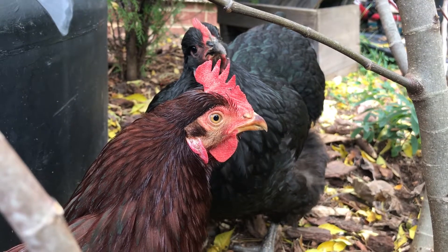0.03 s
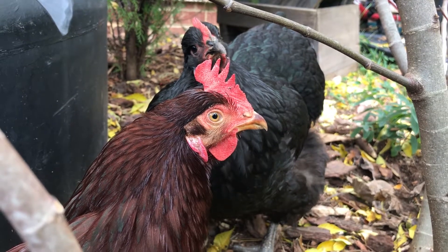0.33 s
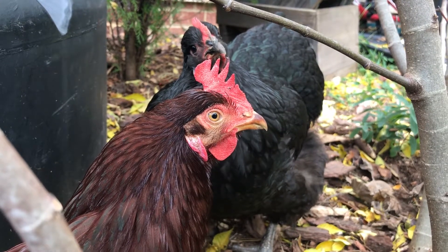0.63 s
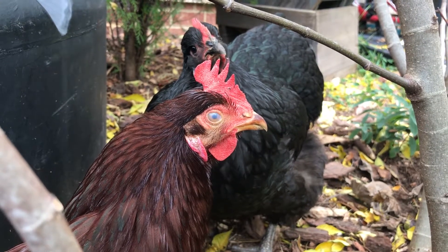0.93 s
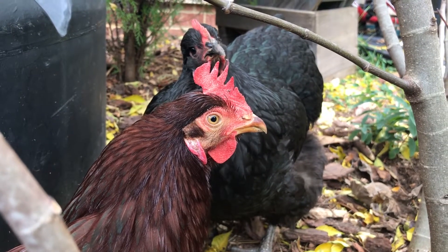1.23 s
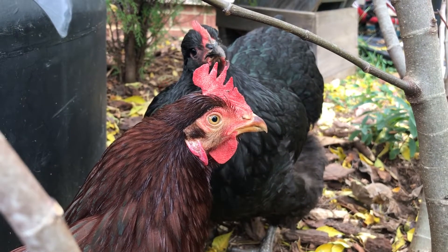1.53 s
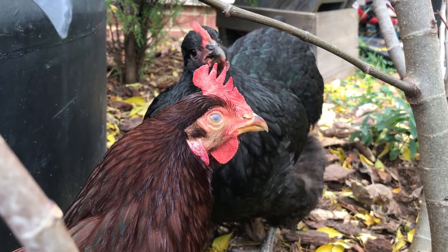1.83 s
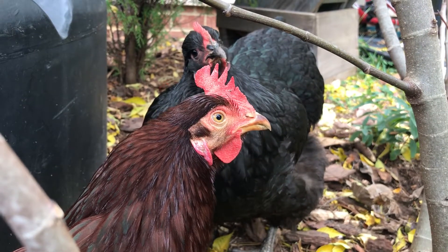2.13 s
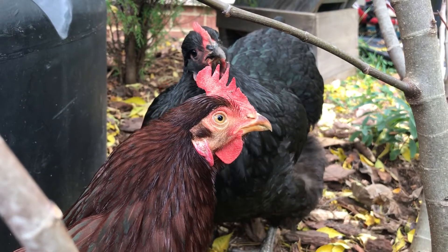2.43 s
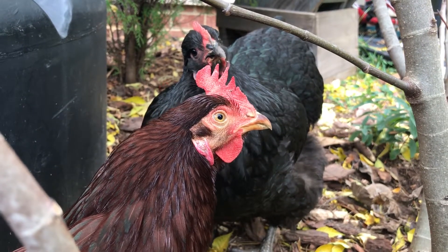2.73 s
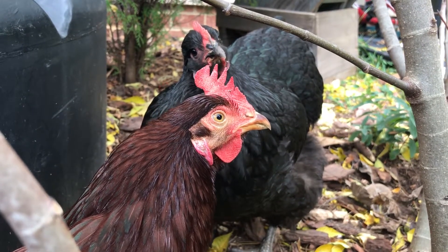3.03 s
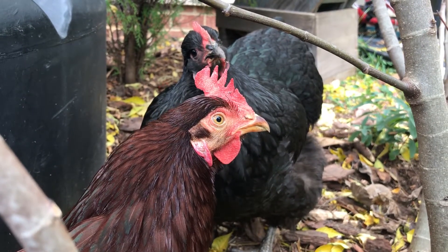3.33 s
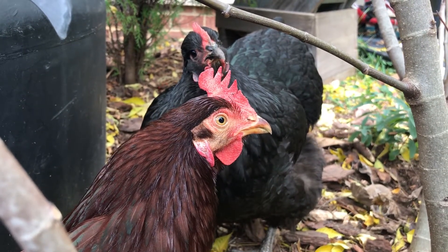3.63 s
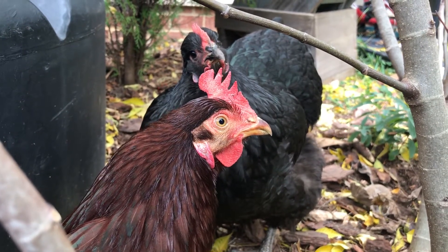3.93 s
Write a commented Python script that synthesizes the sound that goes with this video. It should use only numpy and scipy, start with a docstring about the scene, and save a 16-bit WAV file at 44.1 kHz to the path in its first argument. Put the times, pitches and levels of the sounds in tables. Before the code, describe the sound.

A hen purrs close by from the start until about 3.5 seconds, a rapid run of tiny chirps wavering in pitch. From about 1.3 to 3.1 seconds, louder, higher pips trill over it, probably a second hen, with a low burble between them. A faint outdoor rumble lies underneath, with a barely audible distant bird early on. A soft shuffle swells just before 4 seconds.

```python
"""Two hens resting in fallen leaves.

Close up, one hen purrs throughout: about 37 tiny gliding chirps a second, shaped by her throat.
Midway, louder, higher pips, probably the second hen's, trill over it with a low burble between them.
Behind: a thin far bird, low outdoor rumble, a soft shuffle at the end, faint ticks of the electronics."""
import sys
import numpy as np
from scipy import signal
from scipy.fft import rfft, irfft, next_fast_len
from scipy.io import wavfile
from scipy.ndimage import map_coordinates

SR = 44100
rng = np.random.default_rng(int(sys.argv[2]) if len(sys.argv) > 2 else 0)


def bounce(signal):
    """Save signal as a 16-bit WAV file at the path given by the first command-line argument."""
    frames = np.transpose(np.atleast_2d(signal))
    limited = np.clip(frames, -1, 1)
    pcm = np.round(limited * 32767).astype(np.int16)
    wavfile.write(sys.argv[1], SR, pcm)


N = 176400
T = np.arange(N) / SR

# Purr pace. Each row: time in seconds, chirps so far.
PURR_COUNT = [(.009, 0), (.535, 20), (.877, 33), (1.227, 46), (1.657, 62), (1.776, 66), (2.239, 83),
              (2.655, 98), (3.103, 114), (3.193, 117), (3.504, 128)]
# Purr pitch. Each row: time in seconds, pitch in Hz.
PURR_PITCH_HZ = [(.01, 721), (.115, 888), (.2, 745), (.43, 646), (.51, 732), (.66, 819), (.8, 828),
                 (.825, 720), (.877, 886), (1.04, 631), (1.11, 760), (1.24, 621), (1.44, 591), (1.52, 695),
                 (1.69, 592), (1.86, 654), (2.0, 581), (2.16, 734.5), (2.25, 609.5), (2.36, 709),
                 (2.48, 581), (2.55, 682), (2.66, 573), (2.82, 631), (2.88, 559), (3.02, 757), (3.05, 544),
                 (3.16, 564), (3.221, 807), (3.278, 545), (3.306, 530), (3.335, 789), (3.445, 728),
                 (3.476, 512.5)]
# Purr unrest. Each row: time in seconds, chirp-to-chirp pitch scatter as a fraction.
PURR_JITTER = [(1.2, .035), (1.4, .075), (3, .075), (3.1, .02)]
# Purr effort. Each row: time in seconds, level in dB.
PURR_EFFORT_DB = [(.01, -41.5), (.42, -39), (.95, -39), (1.3, -39), (2.7, -40.5), (3.163, -43),
                  (3.278, -38.5), (3.36, -42.5), (3.48, -38.5)]
# Purr chirps turn from sharp to arched. Each row: time in seconds, arch from 0 to 1, length in seconds.
PURR_SHAPE = [(1.104, 0.19, .019), (1.505, 1, 0.027), (2.913, 1, .02), (3.21, 1, 0.017)]
# The two chirp shapes. Each row: fraction of the length, pitch ratio, level in dB.
SHARP_CHIRP = [(0, 1.0, -22), (.06, 1.04, 1), (.14, 1.08, 5), (.42, .98, -1), (.66, 1.01, -1.5),
               (.88, .82, -8), (1, .68, -22)]
ARCHED_CHIRP = [(0, 0.74, -19.5), (.07, 0.917, -0.5), (.36, 1.156, 1), (.72, .9, -.5), (1, 0.69, -14)]
# Voice source. Each entry: harmonic level in dB, fundamental first.
HARMONICS_DB = [0.5, -12, -24.5, -32.5, -36.5]
# Throat resonances. Each row: frequency in Hz, gain in dB.
THROAT_DB = [(250, -24), (480, -1.5), (700, -0.5), (900, -0.5), (1080, 9), (1280, -1), (1520, -0.5),
             (1800, -5), (2100, -10), (2600, -19.5), (3000, -11.5), (3700, -2.5), (4400, -19)]
# Pips of the trill. Each row: centre in seconds, level in dB.
PIP_NOTES = [(.1198, -28), (1.266, -28), (1.3198, -29), (1.4545, -31.5), (1.4798, -28), (1.5588, -30),
             (1.6391, -29), (1.6664, -31), (1.7189, -26.5), (1.7777, -30.5), (1.7984, -26), (1.8266, -29.5),
             (1.9346, -32), (1.9594, -25), (1.9923, -37), (2.0172, -30), (2.0434, -28.5), (2.0962, -29),
             (2.1235, -26), (2.174, -27.5), (2.2024, -30), (2.23, -25.5), (2.261, -35), (2.287, -28),
             (2.3409, -32), (2.3659, -26), (2.394, -29), (2.421, -26.5), (2.5047, -32), (2.5346, -30),
             (2.5591, -33), (2.5868, -25), (2.6133, -35), (2.6403, -25), (2.6701, -28.5), (2.7524, -34.5),
             (2.7794, -34.5), (2.8057, -33), (2.8318, -29), (2.8581, -28.5), (2.8849, -25.5),
             (2.9155, -30.5), (2.9418, -35), (3.0799, -34), (3.1327, -28.5)]
# Late pips are higher and fall faster.
# Each row: time in seconds, pitch of a loud pip in Hz, fall per half length as a fraction.
PIP_GLIDE = [(1.3, 942.3, 0.0055), (2.4, 963.3, .015), (2.62, 977, 0.0576), (3.13, 996, 0.079)]
# Pip partials, the odd halves from period doubling. Each row: multiple of the pitch, level in dB.
PIP_PARTIALS_DB = [(.5, -23.5), (1, 0.5), (1.5, -24.5), (2, -22.5), (2.5, -39), (3, -42), (4, -41),
                   (5, -52)]
# Burble contour. Each row: time in seconds, level in dB, pitch in Hz.
BURBLE_CONTOUR = [(1.1, -48, 450), (1.25, -37.5, 409), (1.7, -48, 438), (3.06, -43.5, 521.6)]
# Far bird. Each row: start in seconds, length in seconds, pitch in Hz, level in dB, waver in Hz.
BIRD_WHISTLES = [(-.1, 0.45, 7670, -78.5, 100), (1.031, 0.16, 8000, -84, 16)]
# Shuffle swell. Each row: time in seconds, level in dB.
SHUFFLE_LEVEL_DB = [(3.8, -79), (3.92, -66), (4, -50.5)]
# Noise spectra. Each row: frequency in Hz, relative level in dB.
RASP_SPECTRUM = [(220, -33), (430, 8), (950, 8), (1350, -5), (2400, -37.5), (3200, -23), (3650, -15.5),
                 (4300, -59), (12000, -55.5)]
RUMBLE_SPECTRUM = [(24, -31), (38, -5), (60, 1.5), (90, 0.5), (155, -8.5), (220, -19.5), (600, -52.5)]
AIR_SPECTRUM = [(300, -4.5), (670, -10.5), (1100, -9.5), (2500, -23), (4450, -28), (9500, -33.5),
                (10500, -38.5), (13000, -26), (15800, -32)]
SHUFFLE_SPECTRUM = [(100, -10.5), (400, 8), (1000, 4), (1500, -20), (9000, -37)]
TICK_SPECTRUM = [(4000, -16.5), (13000, 1.5)]


def purr(scatter_db=.7):
    """One hen's unbroken run of chirps, no two alike."""
    out = np.zeros(N)
    times_s, counts = np.transpose(PURR_COUNT)
    for start_s in np.interp(np.arange(counts[-1] + 1), counts, times_s):
        pitch_hz, = curves(PURR_PITCH_HZ, start_s)
        effort_db, = curves(PURR_EFFORT_DB, start_s)
        jitter, = curves(PURR_JITTER, start_s)
        arch, length_s = curves(PURR_SHAPE, start_s)
        pitch_hz *= 1 + jitter * rng.uniform(-1.12, 1) * np.sqrt(3)
        gain = amp(effort_db + scatter_db * rng.normal())
        add(out, start_s, gain * chirp(pitch_hz, length_s, arch, roughness=.04))
    return out


def chirp(pitch_hz, length_s, arch, roughness, click_hz=2870, click_t60_s=.011):
    """Gliding harmonics slide through the throat's resonances; sharp chirps open with a click."""
    t = T[:1400]
    progress = t / (length_s * (1 + .05 * rng.normal()))
    sharp_bend, sharp_db = curves(SHARP_CHIRP, progress)
    arched_bend, arched_db = curves(ARCHED_CHIRP, progress)
    bow = arch * np.interp(pitch_hz, [513, 700], [0, 1])  # low chirps fall, high ones arch
    bend = sharp_bend + (arched_bend - sharp_bend) * bow
    slope = .09 * rng.normal() - .21 * (arch - bow)
    hz = pitch_hz * bend * np.exp(slope * (progress - .5) + roughness * wobble(637, t))
    phase = 2 * np.pi * np.cumsum(hz) / SR
    tone = sum(amp(db + spectrum_db(THROAT_DB, k * hz)) * np.sin(k * phase)
               for k, db in enumerate(HARMONICS_DB, 1))
    click_gain = (1 - arch) * (pitch_hz / 700) ** 8.4
    click = click_gain * amp(-32 - 60 * t / click_t60_s) * np.sin(2 * np.pi * click_hz * t)
    envelope = amp(sharp_db + arch * (arched_db - sharp_db)) * (progress < 1)
    return envelope * (tone + click)


def pips(loud_db=-26.5, hz_per_db=6.5, loud_half_s=.0058, rasp_lead_s=.0066, rasp_half_s=.0066):
    """Short arched notes, longer and higher when louder, each starting out of a rasp."""
    tones, rasp_envelope = np.zeros(N), np.zeros(N)
    t = np.arange(-800, 800) / SR
    for centre_s, level_db in PIP_NOTES:
        loud_hz, fall = curves(PIP_GLIDE, centre_s)
        excess_db = level_db - loud_db
        pitch_hz = loud_hz + hz_per_db * excess_db
        half_lengths = t / (loud_half_s * 2 ** (excess_db / 12.5))
        bend = -.0489 * half_lengths ** 2 - fall * half_lengths
        hz = pitch_hz * np.exp(bend + .025 * wobble(772, t))
        phase = 2 * np.pi * np.cumsum(hz) / SR
        tone = np.zeros(len(t))
        for k, partial_db in PIP_PARTIALS_DB:
            scatter_db = (k != 1) * 2 * rng.normal()
            tone += amp(partial_db + scatter_db) * np.sin(k * phase + 2 * np.pi * rng.random())
        add(tones, centre_s + t[0], amp(level_db) * np.exp(-np.abs(half_lengths) ** 2.3) * tone)
        burst = amp(-45 + .69 * excess_db) * np.exp(-np.abs(t / rasp_half_s) ** 3)
        add(rasp_envelope, centre_s + t[0] - rasp_lead_s, burst)
    return tones + rasp_envelope * noise(RASP_SPECTRUM)


def burble(beat_s=.0273, length_s=.018):
    """Soft, low, rough chirps on the trill's beats where no pip comes."""
    out = np.zeros(N)
    pip_times_s = np.transpose(PIP_NOTES)[0]
    pip_beats = np.cumsum(np.round(np.diff(pip_times_s, prepend=pip_times_s[0]) / beat_s))
    free_beats = np.setdiff1d(np.arange(pip_beats[-1]), pip_beats)
    for centre_s in np.interp(free_beats, pip_beats, pip_times_s):
        if centre_s < BURBLE_CONTOUR[0][0]:
            continue
        level_db, pitch_hz = curves(BURBLE_CONTOUR, centre_s)
        pitch_hz *= np.exp(.08 * rng.normal())
        note = chirp(pitch_hz, length_s, arch=.85, roughness=.09)
        add(out, centre_s - length_s / 2, amp(level_db) * note)
    return out


def yard_echo(x, level_db=-21.5, t60_s=.14):
    """Weak, short reflections from trunks and walls."""
    t = T[:SR // 2]
    tail = rng.standard_normal(len(t)) * amp(-60 * t / t60_s) * (t > .003)
    return amp(level_db) * signal.fftconvolve(x, tail / np.linalg.norm(tail))[:N]


def far_bird():
    """Thin, wavering whistles."""
    out = np.zeros(N)
    for start_s, length_s, pitch_hz, level_db, waver_hz in BIRD_WHISTLES:
        progress = np.clip((T - start_s) / length_s, 0, 1)
        swell = np.sqrt(np.abs(np.sin(np.pi * progress)))
        hz = pitch_hz + waver_hz * (wobble(25) + 3 * wobble(1500))
        out += amp(level_db) * swell * np.sin(2 * np.pi * np.cumsum(hz) / SR)
    return out


def outdoor_air(rumble_db=-51, hiss_db=-66):
    """Low, slightly wavering rumble and an even hiss."""
    rumble = amp(rumble_db + .39 * wobble(14)) * noise(RUMBLE_SPECTRUM)
    return rumble + amp(hiss_db) * noise(AIR_SPECTRUM)


def shuffle():
    """Soft shuffle on the ground, swelling at the end."""
    level_db, = curves(SHUFFLE_LEVEL_DB, T)
    return amp(level_db) * noise(SHUFFLE_SPECTRUM)


def ticks(first_s=.088, period_s=.3074, level_db=-59.5, t60_s=.0089):
    """Faint, regular, high ticks of the electronics."""
    age_s = (T - first_s) % period_s
    return amp(level_db - 60 * age_s / t60_s) * noise(TICK_SPECTRUM)


def amp(db):
    """Decibels to gain."""
    return 10 ** (np.asarray(db) / 20)


def spectrum_db(spectrum, hz):
    """Level at hz, interpolated on a log frequency axis."""
    knots_hz, levels_db = np.transpose(spectrum)
    return np.interp(np.log(hz + 1), np.log(knots_hz + 1), levels_db)


def curves(rows, at):
    """Each later column, interpolated along the first."""
    knots, *columns = np.transpose(rows)
    return [np.interp(at, knots, column) for column in columns]


def wobble(rate_hz, t=T):
    """Smooth random curve, rate_hz knots a second."""
    return map_coordinates(rng.standard_normal(4096), [(t - t[0]) * rate_hz + 2], mode="wrap")


def noise(spectrum):
    """Coloured noise of rms 1."""
    size = next_fast_len(N + 8192)
    gain = amp(spectrum_db(spectrum, np.fft.rfftfreq(size, 1 / SR)))
    x = irfft(rfft(rng.standard_normal(size)) * gain, size)[:N]
    return x / x.std()


def add(out, start_s, x):
    """Mix x into out from start_s."""
    i = int(round(start_s * SR))
    part = x[max(-i, 0):max(N - i, 0)]
    out[max(i, 0):max(i, 0) + len(part)] += part


def scene():
    """The hens in their yard, mono."""
    hens = purr() + burble() + pips()
    return (hens + yard_echo(hens) + far_bird() + outdoor_air() + shuffle() + ticks())[None]


def record(dry, cutoff_hz=15850):
    """Brick-wall low-pass."""
    size = next_fast_len(N + 8192)
    passband = np.fft.rfftfreq(size, 1 / SR) < cutoff_hz
    return irfft(rfft(dry, size) * passband, size)[..., :N]


dry = scene()
out = record(dry)
bounce(out)
```